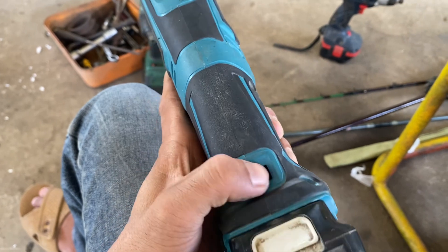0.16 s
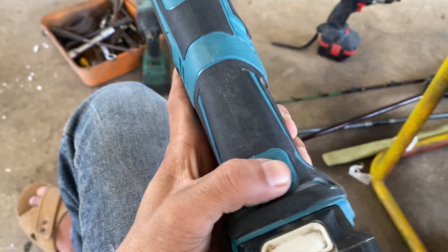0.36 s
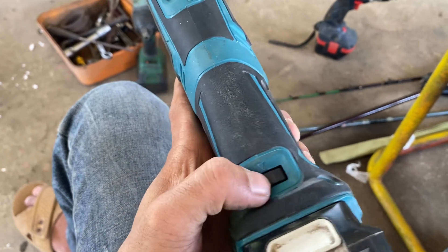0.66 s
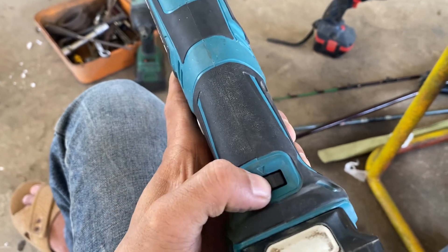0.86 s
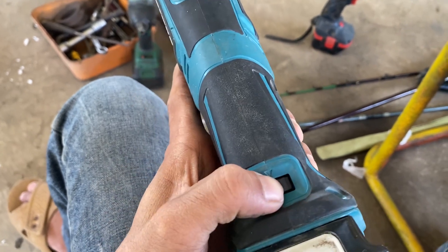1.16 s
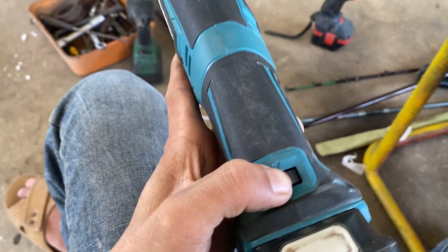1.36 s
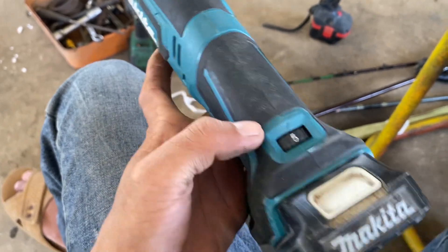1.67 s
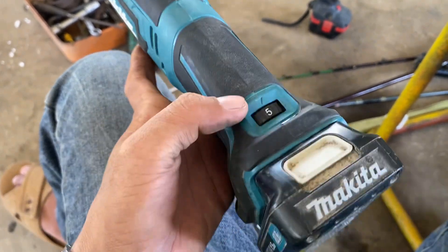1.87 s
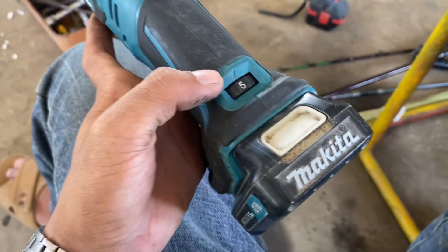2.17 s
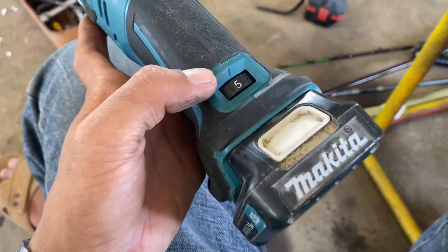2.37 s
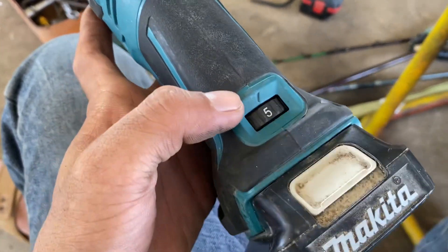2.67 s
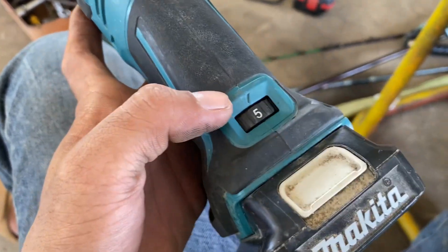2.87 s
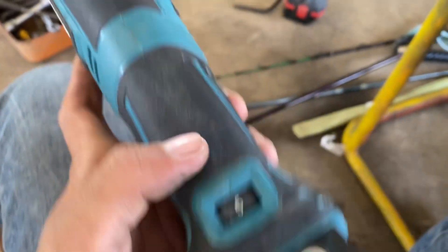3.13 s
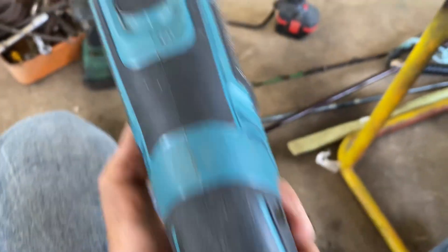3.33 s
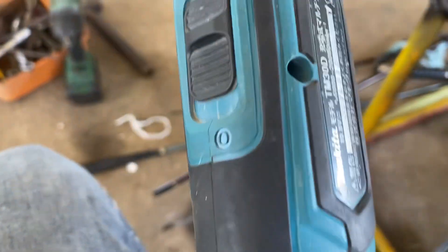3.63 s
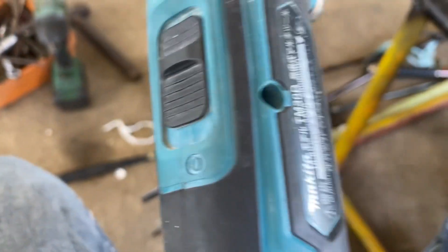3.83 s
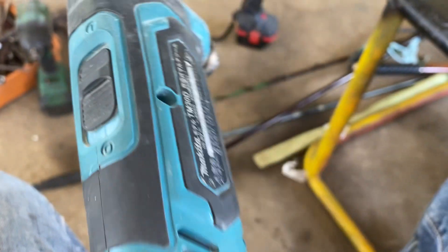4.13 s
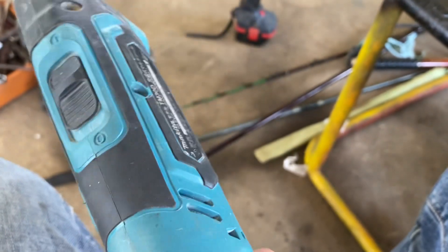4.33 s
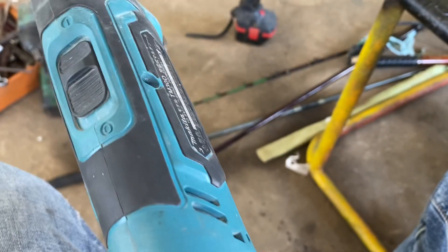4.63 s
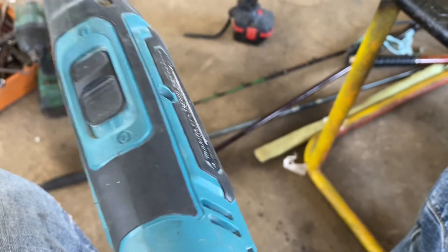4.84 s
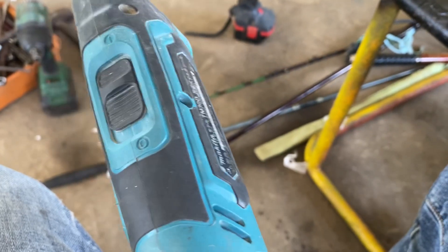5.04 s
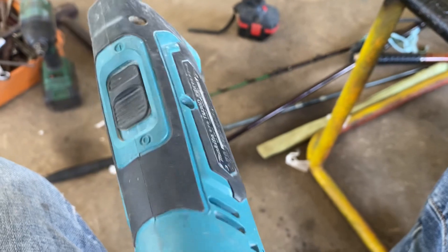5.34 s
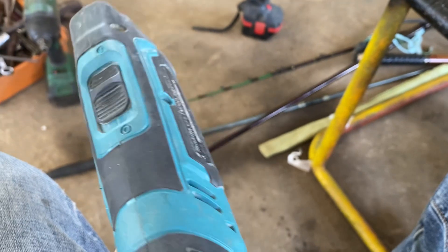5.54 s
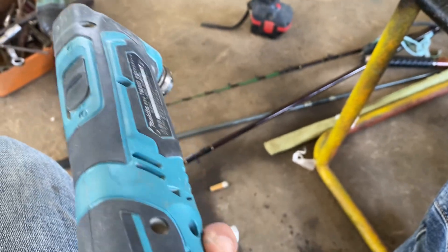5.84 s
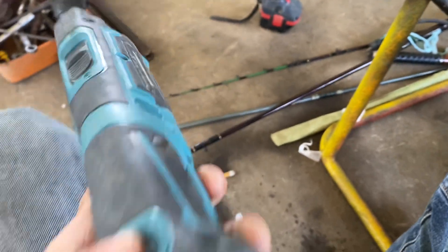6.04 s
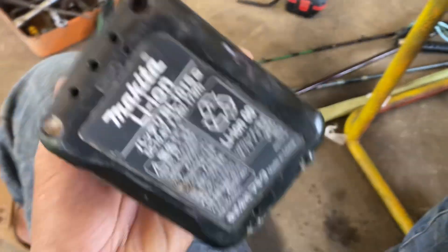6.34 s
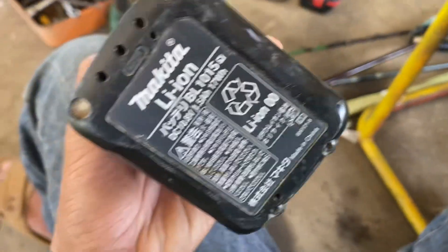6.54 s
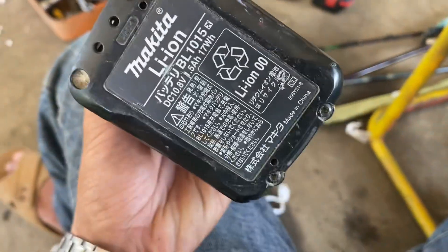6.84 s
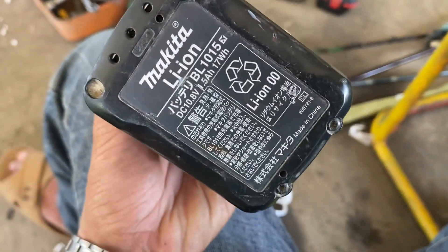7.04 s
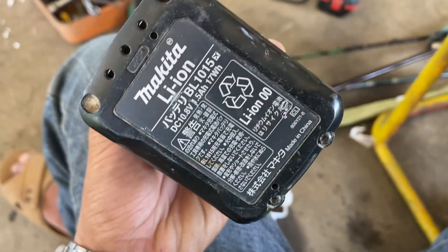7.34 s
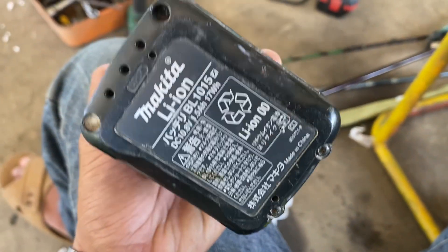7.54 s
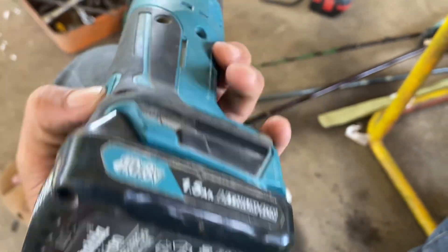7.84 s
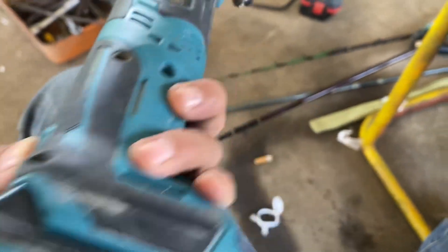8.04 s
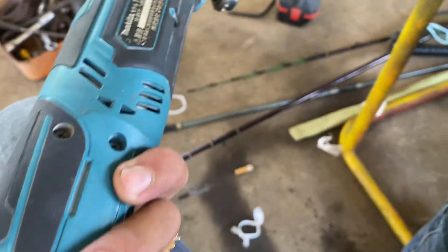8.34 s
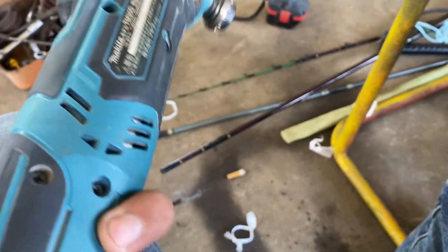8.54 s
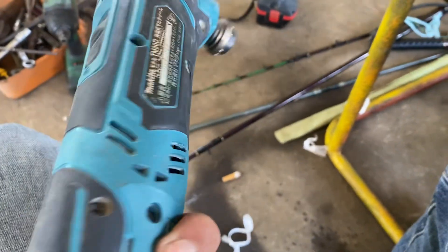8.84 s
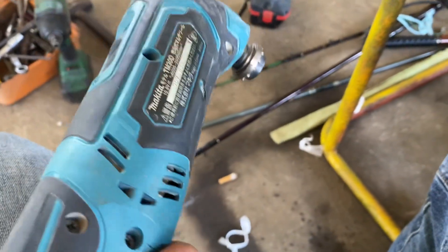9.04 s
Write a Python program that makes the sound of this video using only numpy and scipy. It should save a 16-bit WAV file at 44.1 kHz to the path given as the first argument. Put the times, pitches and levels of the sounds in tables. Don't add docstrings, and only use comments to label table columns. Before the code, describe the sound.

Close buzzing whine of a cordless tool with rattle and handling scrapes coasts down; a small engine sputters, ticks at idle, then revs up.

```python
import sys
import numpy as np
from scipy import signal
from scipy.fft import rfft, irfft, next_fast_len
from scipy.io import wavfile
from scipy.ndimage import uniform_filter1d

SR = 44100
rng = np.random.default_rng(int(sys.argv[2]) if len(sys.argv) > 2 else 0)


def to_wav(sig):
    pcm = np.clip(np.atleast_2d(sig), -1, 1) * 32767
    pcm = np.round(pcm).astype(np.int16)
    wavfile.write(sys.argv[1], SR, pcm.T)


def ratio_of_db(decibels):
    return 10 ** (np.asarray(decibels, float) / 20)


N = 405719
TIME = np.arange(N) / SR
HOP = 32
SLOW = np.arange(0, N, HOP) / SR
SIZE = next_fast_len(N + SR)
FREQ = np.arange(SIZE // 2 + 1) * SR / SIZE + 1e-3


def level(x, db):
    return x * ratio_of_db(db) / np.sqrt(np.mean(x ** 2))


def curves(table):
    s, *columns = np.transpose(table)
    return [np.interp(TIME, s, c) for c in columns]


def across(table, column=1):
    rows = np.array(table)
    return np.interp(np.log(FREQ), np.log(rows[:, 0]), rows[:, column])


def shape(x, gain):
    return irfft(rfft(x, SIZE) * gain, SIZE)[..., :N]


def resonance_db(hz, modes):
    return sum(db / (1 + (2 * (hz - centre) / width) ** 2) for centre, width, db in modes)


def walk(rate, t=TIME):
    knots = rng.standard_normal(500)
    return 1.12 * np.interp(t * rate, np.arange(500), knots)


ORDER_SPREAD_RAD = .35


def stack(hz, orders, tilt, wander_db, blur):
    out = 0
    angle = 2 * np.pi * np.cumsum(hz) / SR
    for k, db in orders:
        slow_db = db + tilt(k) + wander_db * (walk(5, SLOW) + walk(30, SLOW))
        gain = np.repeat(ratio_of_db(slow_db), HOP)[:N]
        slip = blur * np.sqrt(k) * walk(25)
        out = out + gain * np.sin(k * angle + ORDER_SPREAD_RAD * k * k + slip)
    return np.sqrt(2) * out


# pitch_hz, level_db (per Hz)
SHOP_COLOUR = [(18, -38), (30, -5.5), (65, -15), (151, -12), (173, -16.5), (260, -38), (340, -41),
               (570, -120)]


def shop():
    rumble = level(shape(rng.standard_normal(N), ratio_of_db(across(SHOP_COLOUR))), -48.5)
    return rumble * ratio_of_db(0.26 * walk(3.3)) + ratio_of_db(-69) * rng.standard_normal(N)


# start_s, pitch_hz, level_db
WHISTLE = [(4.6, 7993, -76), (5.2, 7993, -64), (6.9, 7993, -66), (7.8, 7993, -63), (8.5, 7993, -56),
           (9.2, 7993, -54)]
# start_s, pitch_hz, level_db
CHARGER = [(6.5, 7310, -90), (6.6, 7310, -66), (7.1, 7230, -67), (7.6, 7110, -67), (8.05, 7020, -65),
           (8.2, 7000, -90)]


def whistles():
    out = 0
    for hz, db in (curves(WHISTLE), curves(CHARGER)):
        out = out + stack(hz, [(1, -4)], lambda k: db[::HOP], wander_db=1.2, blur=.2)
    return out


# start_s, level_db, pitch_hz, width_hz, fade_s (to fall 60 dB)
TAPS = [
    (6.89, -41.5, 5830, 400, 0.33),
    (6.955, -48, 6000, 300, 0.25),
    (6.886, -39, 7000, 11000, 0.24),
    (7.11, -30.5, 1160, 670, 0.37),
    (7.2, -38, 1400, 2400, 0.3),
    (7.16, -29.5, 1000, 1740, 0.31),
    (4.3, -43, 5300, 5000, .091),
]
# start_s, level_db, pitch_hz, width_hz, fade_s (to
# fall 60 dB)
NOISE_SWELLS = [(1.989, -33, 218, 250, 0.22), (2.54, -33, 900, 900, 0.25), (2.8, -35, 151, 149, 0.14),
                (3.18, -23, 2560, 500, 1.2), (3.3, -24.5, 4300, 1300, 2.4), (3.54, -30, 150, 150, 0.12),
                (4.55, -32, 3900, 359, 3.1), (5.54, -36, 317, 196.5, 0.099), (5.92, -30.5, 2500, 3840, 0.25),
                (7.175, -32, 476, 200, 0.14), (4.119, -28, 2570, 500, 1.74), (7.75, -35.5, 3840, 500, 1.9),
                (8.1, -39, 570, 199, 3.4), (8.399, -33, 4100, 500, 2.5), (8.0, -34.5, 1494, 2310, 0.41),
                (8.66, -33, 5000, 5000, 0.19), (0.0, -34, 4600, 3600, 1.7), (7.94, -34, 2900, 3000, .5),
                (8.05, -35, 3000, 3400, 0.38), (3.33, -27.5, 950, 250, .4), (3.8, -24.5, 970, 300, 0.29),
                (4.22, -33, 940, 250, 0.36), (4.38, -29, 950, 250, 0.25), (4.58, -30, 940, 250, 0.35)]
TAP_RISE_S, SWELL_RISE_SHARE = 0.0043, 0.12


def knocks():
    out = np.zeros(N + SR)
    t = np.arange(SR) / SR
    taps = [row + (TAP_RISE_S,) for row in TAPS]
    noise_swells = [row + (SWELL_RISE_SHARE * row[-1],) for row in NOISE_SWELLS]
    for s, db, hz, width, t60, rise in taps + noise_swells:
        edges = [max(hz - width / 2, 30), hz + width / 2]
        band = signal.butter(2, edges, "band", fs=SR, output="sos")
        burst = level(signal.sosfilt(band, rng.standard_normal(len(t))), db - 3.5)
        fade = ratio_of_db(-60 * np.maximum(t - rise, 0) / t60)
        i = int(s * SR)
        out[i:i + len(t)] += burst * np.minimum(t / rise, 1) * fade
    return out[:N]


# start_s, level_db
TAPPETS = [(6.25, -69), (6.36, -41), (6.65, -44), (6.88, -56), (6.95, -49), (7.1, -48), (7.44, -43),
           (7.63, -43.5), (7.75, -59)]
# start_s, peak_db
TICKS = [(6.2818, -36), (6.3576, -30.5), (6.396, -32), (6.4788, -32), (6.5137, -33), (6.5422, -39),
         (6.5801, -36), (6.6095, -35), (6.6295, -39), (6.6449, -33), (6.6988, -35), (6.7582, -33),
         (6.7851, -35), (6.8135, -32), (6.9128, -38), (6.9268, -32), (6.9946, -39), (7.0485, -31),
         (7.071, -40), (7.1184, -34), (7.1508, -35), (7.1653, -27), (7.217, -27), (7.2441, -27),
         (7.2825, -41), (7.3935, -31), (7.4192, -29), (7.6008, -31), (7.6197, -26.5), (7.7, -42),
         (7.7534, -38), (7.7719, -44), (7.8048, -40)]
TICK_HZ, TICK_WIDTH_HZ, TICK_T60_S, TICK_DB = 2330, 90, .06, -1


def tappets():
    bed = (rng.random(N) < 900 / SR) * rng.standard_normal(N) * ratio_of_db(2.9 * walk(45))
    cover = 1 / (1 + ((FREQ - TICK_HZ) / 150) ** 4)
    idling = np.interp(TIME, [6.2, 6.28, 7.7, 7.8], [0, 1, 1, 0])
    out = level(shape(bed, cover), -5.5) * ratio_of_db(curves(TAPPETS)[0]) * idling
    t = np.arange(SR // 8) / SR
    for (s, db), chance in zip(TICKS, rng.standard_normal((len(TICKS), 2))):
        tones_hz = TICK_HZ + TICK_WIDTH_HZ * chance[:, None]
        pair = np.array([.7, .3]) @ np.sin(2 * np.pi * tones_hz * t)
        ring = pair * np.minimum(t / 0.0005, 1) * ratio_of_db(-60 * t / TICK_T60_S)
        click = 0.29 * rng.standard_normal(len(t)) * ratio_of_db(-60 * t / 0.011)
        i = int(s * SR)
        out[i:i + len(t)] += ratio_of_db(db + TICK_DB) * (ring + click)
    return out


# start_s, peak_db
CATCHING = [(5.6088, -31), (5.6682, -31.5), (5.8447, -21.5), (5.9237, -22.5), (5.9977, -27), (6.0654, -23),
            (6.1193, -37.5), (6.178, -32)]
# start_s, firing_number
CRANK = [(6.236, 0), (6.4045, 2), (6.6295, 5), (7.0943, 11), (7.2508, 13), (7.782, 20), (7.939, 22),
         (8.0221, 23), (8.4137, 28), (8.6569, 31), (8.729, 32), (8.9085, 35), (9.015, 37), (9.1699, 40)]
# start_s, firing_peak_db, throttle_db (opens the casing clatter)
ENGINE = [
    (6.2, -21, 1),
    (6.5, -20.5, 2.5),
    (6.9, -23, -0.5),
    (7.2, -20.5, 2.5),
    (7.55, -21, 5.5),
    (7.95, -20, 11.5),
    (8.3, -20, 15.5),
    (8.55, -19, 20),
    (9.2, -14.5, 25),
]


def firings():
    s, number = np.transpose(CRANK)
    s = np.interp(np.arange(number[-1] + 1), number, s)
    return CATCHING + list(zip(s, np.interp(s, TIME, curves(ENGINE)[0])))


# pitch_hz, level_db, fade_s (to fall 60 dB), lead_s (start before the peak),
# gain_db (per dB of harder firing)
EXHAUST = [(66.4, -7, 0.27, 0.0103, -1.8), (129.8, -8, 0.33, 0.0057, -0.4),
           (106.2, 2.5, 0.038, 0.00739, 0.5), (202.3, -10.5, 0.14, 0.01387, -0.2),
           (259, -11.5, 0.15, 0.018, 0.96), (380, -12.5, 0.017, 0.021, 0.65)]
# start_s, pitch_hz, level_db
RISING_WHINE = [(8.45, 640, -66), (8.75, 750, -50), (8.8, 775, -47), (8.9, 850, -42), (9, 910, -38),
                (9.1, 943, -35), (9.2, 962, -35)]
# multiple, level_db
RISING_WHINE_ORDERS = [(.6, -9), (.7, -14), (.8, -8), (1.002, -.5), (1.2, -11), (1.601, -7.5), (1.998, -8),
                       (2.2, -14), (2.4, -7), (2.6, -11), (2.8, -7), (3.503, -9), (4.0, -9), (4.201, -8), (4.4, -9),
                       (4.8, -10)]
# start_s, pitch_hz, level_db
IDLE_WHINE = [(7.2, 419.4, -63), (7.412, 424.5, -52), (7.72, 469, -53.5), (8.1, 428, -76)]


def engine():
    fired = firings()
    kicks = np.zeros((len(EXHAUST), N))
    scatter = rng.standard_normal((len(fired), len(EXHAUST)))
    t = np.arange(SR // 2) / SR
    thumps = 0
    for k, (hz, db, t60, lead, per_db) in enumerate(EXHAUST):
        for (s, peak_db), chance in zip(fired, scatter):
            harder_db = max(peak_db + 19.5, 0)
            kicks[k, int((s - lead) * SR)] = ratio_of_db(peak_db + per_db * harder_db + 1.47 * chance[k])
        ring = -np.sin(2 * np.pi * hz * t) * ratio_of_db(db - 60 * t / t60) * np.minimum(t / 0.0017, 1)
        thumps = thumps + signal.fftconvolve(kicks[k], ring)[:N]
    puff = signal.fftconvolve(kicks[-1], ratio_of_db(-60 * t / 1.1))[:N]
    gas = level(shape(rng.standard_normal(N), 1 / (1 + ((FREQ - 300) / 160) ** 4)), -30) * puff
    rising_hz, rising_db = curves(RISING_WHINE)
    rising_whine = stack(rising_hz, RISING_WHINE_ORDERS, lambda k: rising_db[::HOP], wander_db=1.5, blur=.35)
    rising_whine = rising_whine * np.clip((TIME - 8.45) / .15, 0, 1)
    idle_hz, idle_db = curves(IDLE_WHINE)
    idle = stack(idle_hz, [(0.96, 2.8)], lambda k: idle_db[::HOP], wander_db=0.5, blur=0.15)
    idle = idle * np.interp(TIME, [7.1, 7.3, 8, 8.2], [0, 1, 1, 0])
    bass_cut = 1 / np.sqrt(1 + (47 / FREQ) ** 8)
    return ratio_of_db(-1.5) * shape(thumps, bass_cut) + gas + idle + rising_whine


# start_s, whine_db, ring_db (shell, as the grip loosens), air_db,
# aim_db (vents pointing at the phone)
TOOL = [(0.0, -44.5, -13, -42.5, 1.5), (0.21, -41.5, -12, -38, -0.5), (0.37, -34.5, -1, -36.5, 1),
        (0.5, -32.5, -11.5, -35, 0), (0.8, -32.5, -9, -37, 0.5), (1.19, -31, -3.5, -33, 0),
        (1.6, -33.5, -3, -34.5, 0.5), (2.0, -33.5, -2, -34.5, 0.5), (2.3, -33, 0, -34.5, 0.5),
        (2.64, -34, 3, -33.5, 1), (2.9, -35.5, 7, -36, 3), (3.15, -31, 1, -32.5, 0),
        (3.43, -31.5, -1, -32, 0.5), (3.86, -32.5, -6, -30, 1.5), (4.22, -37, 11.5, -32.5, 1),
        (4.45, -36, -2.5, -34, 1), (4.68, -37.5, 2.5, -34.5, 2), (4.89, -37.5, -2, -38, 2),
        (5.2, -44, -11, -42.5, 3.5), (5.4, -46.5, -14.5, -39, 1), (5.75, -53.5, -4.5, -39, -1)]
RATTLE_PER_S, RATTLE_HZ, RATTLE_WIDTH_HZ, RATTLE_DB = 170, 1060, 290, -8.5


def rattle():
    hits = (rng.random(N) < RATTLE_PER_S / SR) * rng.standard_normal(N)
    clamp = 1 / (1 + (2 * (FREQ - RATTLE_HZ) / RATTLE_WIDTH_HZ) ** 4)
    ring = level(shape(hits, clamp), RATTLE_DB)
    at_speed = np.interp(TIME, [.25, .5, 4.7, 5.1], [0.0, 0.53, 0.62, 0.015])
    return ring * ratio_of_db(curves(TOOL)[2] + 2.4 * walk(5.36)) * at_speed


# pitch_hz, level_db (per Hz)
RUSH_COLOUR = [(150, -22), (400, -5), (700, -5), (1400, -1.5), (1750, -0.5), (3000, 3), (6500, -5.5),
               (8000, -4), (9700, 0.5), (11000, -12.5), (12700, -15.5), (14000, -17), (15500, -20.5)]
# pitch_hz, width_hz, lift_db
HOUSING = [(980, 300, 7), (1320, 200, -4), (1700, 300, -5), (2400, 650, 6), (3500, 400, -5), (4000, 450, 6),
           (4800, 500, 3)]
# pitch_hz, width_hz, lift_db
CASING = [(620, 200, -8), (1000, 400, 3), (1350, 200, -8), (1800, 300, -7), (2500, 800, 4), (3500, 400, -2),
          (4020, 400, 4), (5050, 300, 3)]
# centre_hz, tool_db, aim_db (per dB of aim), ring_db (per dB of ring),
# engine_db, throttle_db (per dB of throttle)
BANDS = [(850, -2, 0.02, -0.03, -1.1, 0.388), (2436, -2.5, 0.25, -0.39, -5.5, 0.72),
         (5000, -3.5, 0.9, 0.03, -12.5, 0.97), (9800, 1.6, 2, -0.06, -14, 1.25)]
HANDOVER_S, AIR_DIES_DB_S, CASING_DB = 5.986, 112, -47


def rush(turns):
    coarse = np.repeat(rng.standard_normal(N // 40 + 1), 40)[:N]
    grain = rng.standard_normal(N) * ratio_of_db(1.0 * walk(40) + 2.0 * coarse)
    swing = 1 + 0.013 * np.cos(2 * np.pi * turns) + 0.078 * np.cos(4 * np.pi * turns)
    later = np.clip((TIME - HANDOVER_S) / 0.069, 0, 1)
    dying_db = AIR_DIES_DB_S * np.maximum(TIME - HANDOVER_S, 0)
    lifts_db = np.array([resonance_db(FREQ, HOUSING), resonance_db(FREQ, CASING)])
    bodies = ratio_of_db(across(RUSH_COLOUR) + lifts_db)
    _, ring_db, air_db, aim_db = curves(TOOL)
    throttle_db = curves(ENGINE)[1]
    centres = np.log(np.array(BANDS)[:, 0])
    out = 0
    for k, (_, tool_db, per_aim, per_ring, engine_db, per_throttle) in enumerate(BANDS):
        share = np.sqrt(np.interp(np.log(FREQ), centres, np.arange(4) == k))
        air, clatter = shape(np.array([grain * swing, grain]), bodies * share)
        air_gain_db = air_db + per_aim * aim_db + per_ring * ring_db - dying_db
        air = level(air, tool_db) * ratio_of_db(air_gain_db)
        clatter = level(clatter, engine_db + CASING_DB) * ratio_of_db(per_throttle * throttle_db) * later
        out = out + (air + clatter) * ratio_of_db(0.52 * walk(16))
    return out


# start_s, pitch_hz
SPEED = [(0.0, 212), (0.13, 216.7), (0.206, 224.2), (0.298, 249.7), (0.36, 273.6), (0.43, 293.5),
         (0.49, 301), (1.19, 298.6), (2.0, 291.8), (2.45, 288.5), (2.64, 290.9), (2.85, 292.2),
         (3.06, 291.0), (3.43, 285.8), (4.2, 285), (4.41, 272.8), (4.65, 266.4), (4.89, 245.1),
         (5.05, 224.6), (5.34, 185.2), (5.78, 122), (5.95, 106)]
# multiple, level_db
TOOL_ORDERS = [(1, -11), (2, -6.5), (3, -13), (4, -4), (5, -9), (6, -17), (7, -6), (8, 0), (9, -11),
               (10, -14), (11, -10), (12, -11), (13, -17), (14, -22), (15, -17), (16, -20), (17, -12),
               (18, -15), (19, -19), (20, -18), (21, -18), (22, -20), (23, -22), (24, -14), (25, -11)]
# multiple, level_db
TURNED_ORDERS = [(1, -4.5), (2, -5.5), (3, -10.5), (4, -7), (5, -8), (6, -10), (7, 1), (8, -1.5), (9, -5.5),
                 (10, -5.5), (11, -24), (12, -10), (13, -8), (14, -9.5), (15, -3.5), (16, -14), (17, -8),
                 (18, -10), (19, -9), (20, -16), (21, -12), (22, -14), (23, -16), (24, -12.5), (25, -18)]
# multiple, rising_db (under load on the way up), coasting_db
SLOW_ORDERS = [(1, -6, -3), (2, 8, 1), (3, 8, 13), (4, -3, 4), (5, 6, 13), (6, 4, 10), (7, 4, 7),
               (8, 0, 11), (9, -4, 0), (10, -3, 9), (11, -8, 15), (12, -10, 1), (13, -8, 5), (14, -4, 5),
               (16, -4, 8), (17, -6, 5), (20, -7, 2), (25, -6, 0)]
# multiple, gain_db (per dB of aim)
AIM_ON_ORDERS = [(1, 2.5), (2, 1), (5, -0.18), (12, 2.46)]
# multiple, centre_s, length_s, gain_db
SWELLS = [(2, 3.63, 0.36, 3), (3, 4.2, 0.74, -5), (3, 5.4, .3, -3.5), (4, 1.4, .45, 4), (4, 2.67, 0.24, -1),
          (4, 4.85, 0.13, 4), (5, 1.94, 0.33, 3.5), (5, 4.1, .7, -2.5), (5, 4.85, 0.38, -5.5),
          (6, 4, 0.37, -3), (6, 6.1, 0.39, -5), (7, 1.14, 0.38, -10), (7, 2.8, .25, -6), (8, 1.4, 0.54, 1),
          (8, 4.34, 0.19, 4.5), (8, 5.24, .3, 5), (9, 5.3, 0.21, 10), (9, 4.1, .2, -11), (9, 4.1, .3, 7),
          (12, 2.92, 0.41, -15), (13, 5, .7, -4), (13, 5.1, 0.2, 12), (15, 2.4, 1.0, -22),
          (15, 4.3, .7, -13), (16, 2.95, 0.37, 5), (17, 3.3, 0.31, -3), (17, 5.4, .3, -10),
          (17, 6.5, 0.18, 16), (18, 3.6, .25, -4), (18, 4.1, 0.4, 7), (19, 3.8, .7, -8), (7, 1.7, 0.23, 1),
          (7, 3.7, 0.31, 2), (8, .62, 0.43, 0.5), (8, 4, 0.59, -2.5), (5, 5.75, 0.18, 12),
          (17, 4.95, .15, 1), (18, 4.75, .25, 1), (8, 2.93, 0.51, 2.5), (9, 2.97, 0.36, -4),
          (5, 5.25, 0.38, 3), (5, .1, 0.48, 1.5), (6, .1, .4, 5), (9, 0.21, 0.36, 2), (10, 0.22, .4, 3),
          (4, 2.5, .3, 3.5)]
# pitch_hz, width_hz, lift_db
ARM = [(266.3, 18.7, -15)]
# multiple, level_db
BEARING = [(3.3, -42.5), (2.3, -59), (4.29, -49.5)]
# start_s, speed_ratio
CAGE_SLIP = [(0, 1.0), (1.5, 1.005), (2.1, 0.997), (2.6, 1.002), (3.3, .99), (5.8, .99)]
SHELL_HZ, SHELL_WIDTH_HZ = 2580, 540


def tool():
    speed, = curves(SPEED)
    hz = speed[::HOP]
    whine_db, ring_db, _, aim_db = (c[::HOP] for c in curves(TOOL))
    turned = np.interp(SLOW, [3.2, 3.45], [0, 1])
    table = {k: a + (b - a) * turned for (k, a), (_, b) in zip(TOOL_ORDERS, TURNED_ORDERS)}
    fade_db = np.interp(hz, [250, 283], [.9, .25])
    low_db = np.interp(hz, [215, 285], [-5, 0])
    contrast = np.interp(hz, [225, 292], [.3, .99])
    orders, rising, coasting = np.transpose(SLOW_ORDERS)
    body = [(SHELL_HZ, SHELL_WIDTH_HZ, ring_db)] + ARM

    def slide(k):
        return resonance_db(k * hz, HOUSING) - resonance_db(k * 290, HOUSING)

    def slow(k):
        return np.where(SLOW < 3, np.interp(k, orders, rising), np.interp(k, orders, coasting))

    def pose(k):
        return aim_db * np.interp(k, *np.transpose(AIM_ON_ORDERS)) + resonance_db(k * hz, body)

    def swell(k):
        return sum(db * np.exp(-(2 * (SLOW - s) / length) ** 2)
                   for order, s, length, db in SWELLS if round(order) == k)

    def tilt(k):
        favoured = contrast * (table[k] + 8) - 9.0 + (1 - contrast) * slow(k)
        losses = low_db * (k < 3) - fade_db * max(k - 12, 0)
        return whine_db + swell(k) + slide(k) + favoured + pose(k) + losses

    def bearing_tilt(k):
        return slide(k) + 1.5 * (whine_db + low_db + 32.5)

    whine = stack(speed, [(k, .5) for k in table], tilt, wander_db=1.3, blur=.15)
    cage_hz = speed * curves(CAGE_SLIP)[0]
    bearing = stack(cage_hz, BEARING, bearing_tilt, wander_db=1.5, blur=0.58)
    stopping = np.clip((5.95 - TIME) / 0.69, 0, 1)
    return (whine + bearing) * stopping, np.cumsum(speed) / SR


# pitch_hz, left_minus_right_db, reflected_share (0-1, no unit)
PORTS = [(60, .3, 0.03), (250, -0.5, 0.36), (450, 2, 0.62), (645, 8, 0.22), (1520, 4, 1), (3100, 3.5, 0.5),
         (5600, 4.5, 0.55), (6450, .5, .2), (7400, 0, .25), (8500, 0, .06), (10300, 0, .12),
         (15105, 0, .15)]
SHOP_T60_S = 0.077


def scene():
    whine, turns = tool()
    dry = whine + rattle() + rush(turns) + engine() + tappets() + knocks() + shop()
    t = np.arange(SR // 4) / SR
    tails = rng.standard_normal((2, len(t))) * ratio_of_db(-60 * t / SHOP_T60_S) * (t > .001)
    echoes = rfft(tails / np.sqrt(np.sum(tails ** 2, axis=1, keepdims=True)), SIZE)
    pose = 3.088 * TIME + 0.97 * walk(2.032)
    first, second = shape(dry, np.clip(across(PORTS, column=2), 0, 1) * echoes)
    reflected = np.cos(pose) * first + np.sin(pose) * second
    return dry + np.array([[1], [-1]]) * reflected


def starve(pair, under_db, from_hz, sparse_hz, waver_db):
    mid_side = np.array([pair[0] + pair[1], pair[0] - pair[1]]) / 2
    hz, _, z = signal.stft(mid_side, SR, nperseg=1024)
    hz = hz[:512, None]
    bins = np.abs(z[:, :512]) ** 2
    power = np.repeat(np.mean(bins.reshape(2, 64, 8, -1), axis=2), 8, axis=1)
    power = uniform_filter1d(power, 5, axis=2)
    chance = rng.standard_normal((64, z.shape[2] // 7 + 1))
    waver = waver_db * np.kron(chance, np.ones((8, 7)))[:, :z.shape[2]]
    allowed_db = np.interp(hz, [from_hz, 6500, 8500, 10300, 11500, 15500], [8, 6, 9, 2.5, -1.0, -6.5])
    need_db = under_db + waver - allowed_db
    kept = waver > waver_db * np.interp(hz, [11000, 12500, 14900, 15200], [-9, -1.7, -1.7, -.4])
    strong = power > power[::-1] * ratio_of_db(2 * need_db) * (hz > from_hz)
    clear = bins > .9 * power * ratio_of_db(2.5 * waver) * (hz > sparse_hz)
    z[:, :512] *= strong & kept & clear
    mid, side = signal.istft(z, SR, nperseg=1024)[1][:, :N]
    return np.array([mid + side, mid - side])


def low_pass(x):
    return signal.sosfilt(signal.butter(12, 15680, fs=SR, output="sos"), x)


# pitch_hz, lead_cycles (right port ahead of left)
PORT_LEAD = [(60, 0), (700, -.1), (5500, -.08), (6550, 0), (8500, .5), (10300, 1), (12150, 1.5), (14000, 2),
             (15700, 2.5)]


def record(dry):
    side = np.array([[1], [-1]]) / 2
    bass_cut = 1 / np.sqrt(1 + (58 / FREQ) ** 8)
    ports = ratio_of_db(side * across(PORTS)) * np.exp(-2j * np.pi * side * across(PORT_LEAD)) * bass_cut
    pair = starve(shape(dry, ports), under_db=-2.0, from_hz=2400, sparse_hz=12600, waver_db=3.0)
    return low_pass(pair + whistles())


dry = scene()
out = record(dry)
to_wav(out)
```